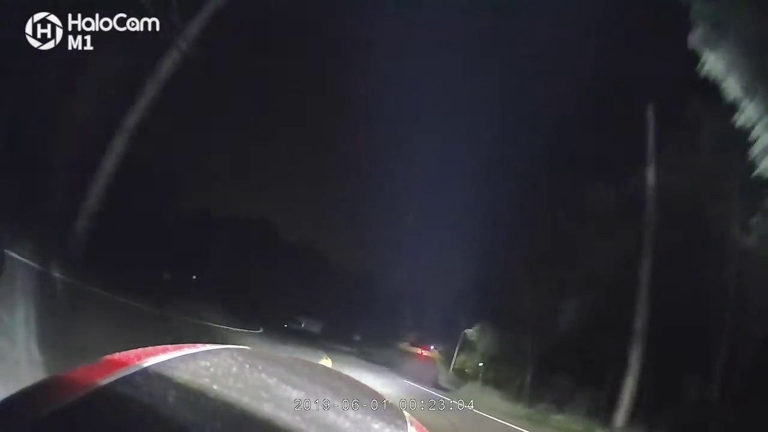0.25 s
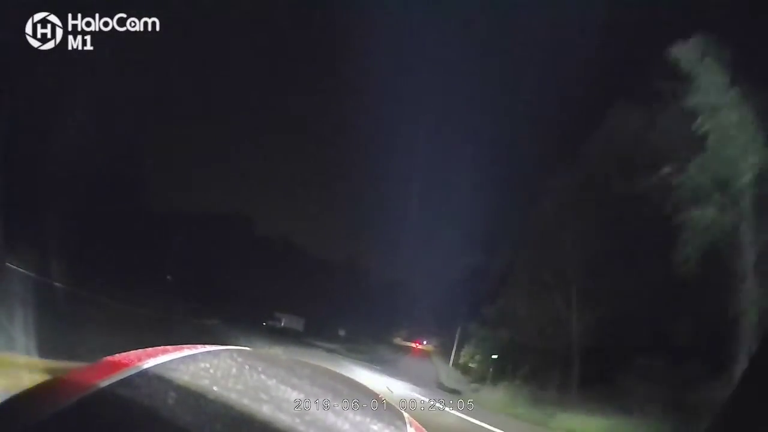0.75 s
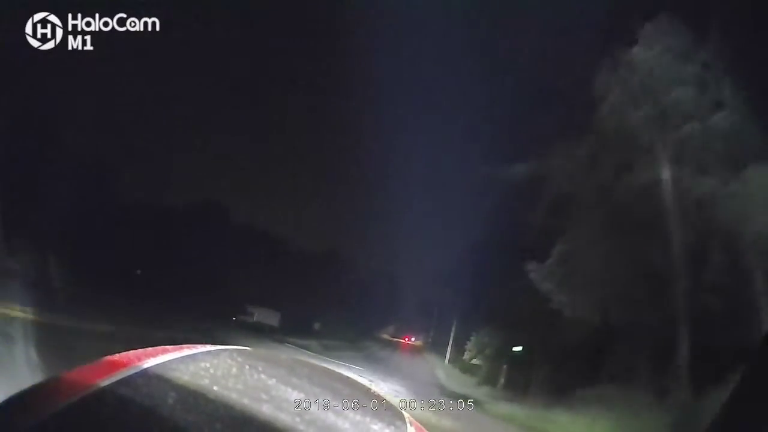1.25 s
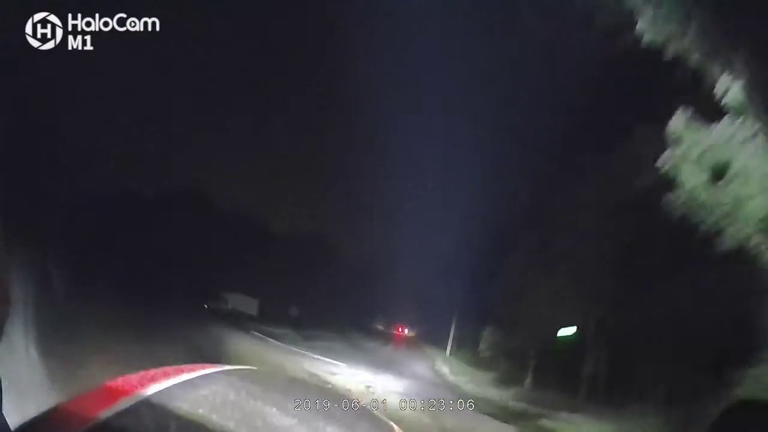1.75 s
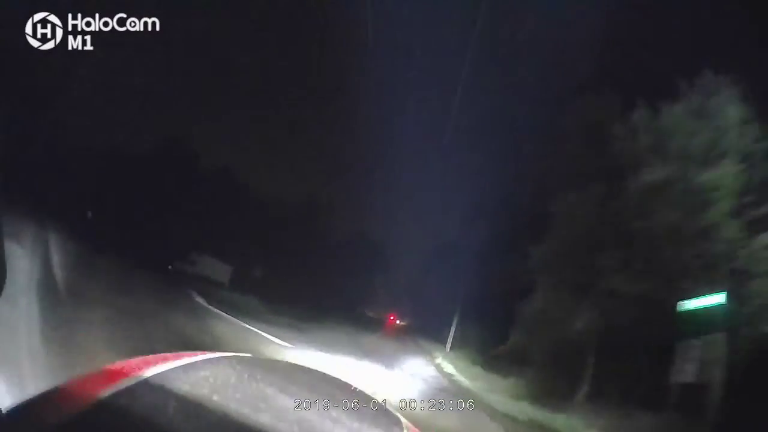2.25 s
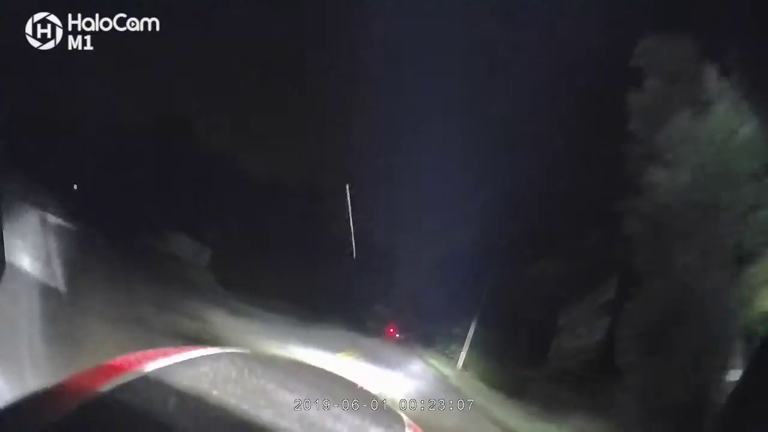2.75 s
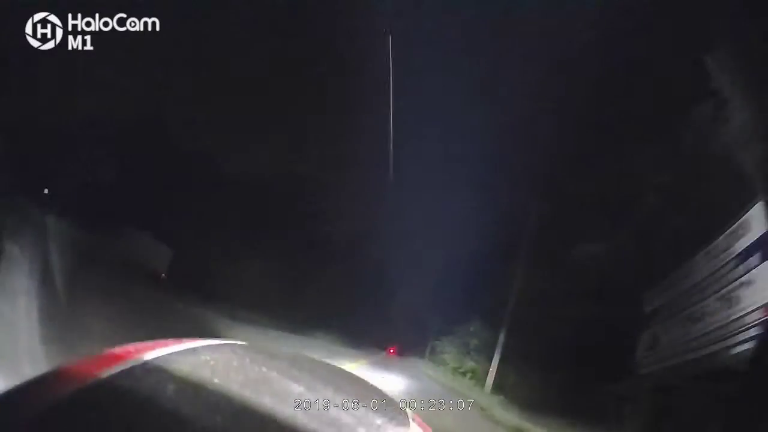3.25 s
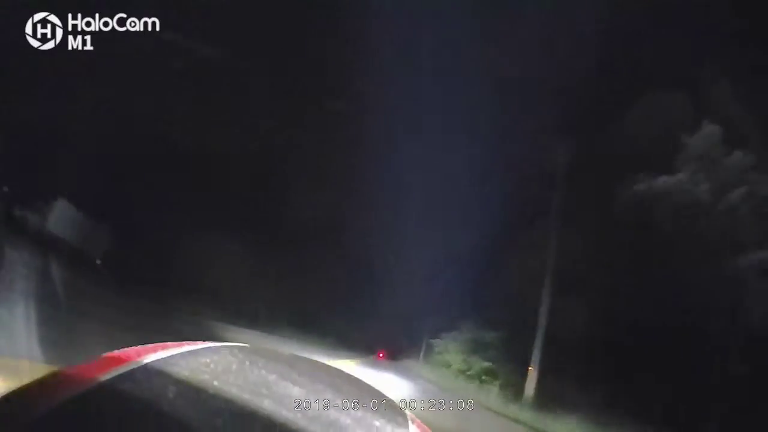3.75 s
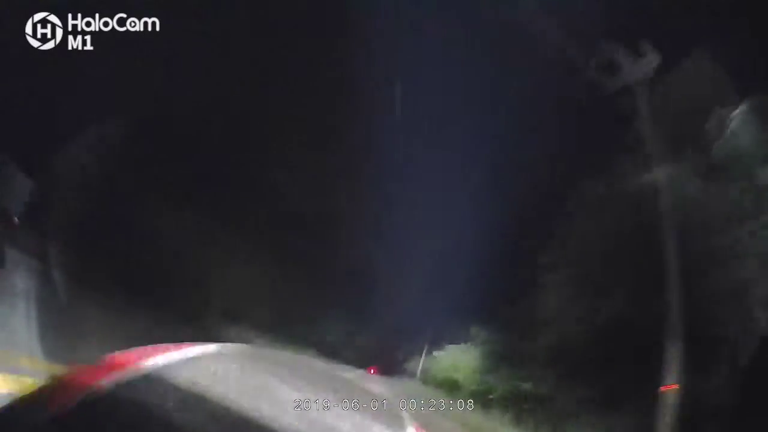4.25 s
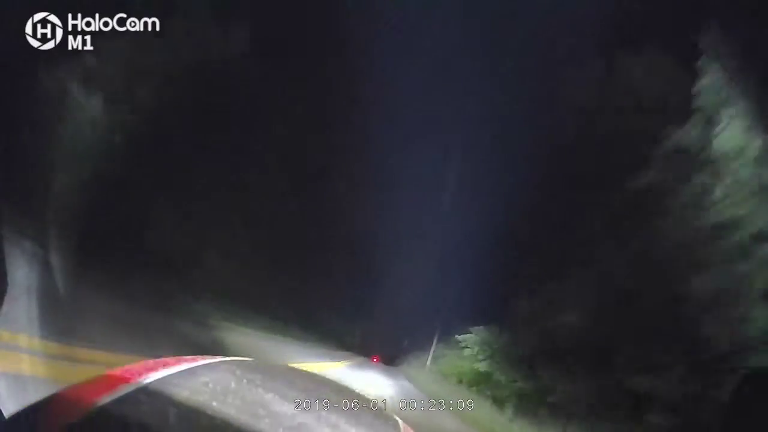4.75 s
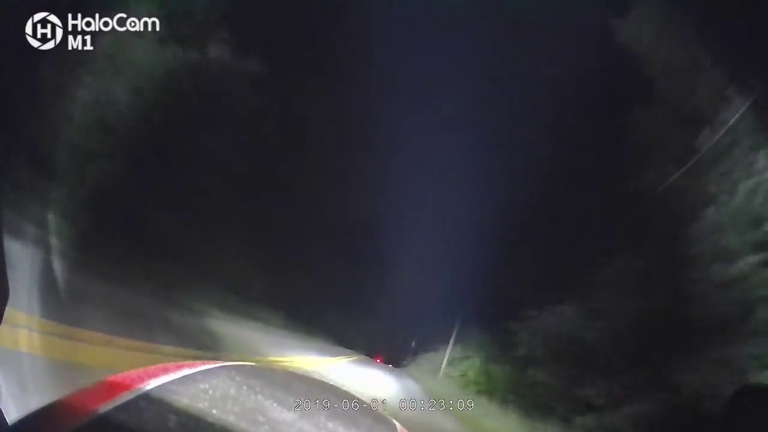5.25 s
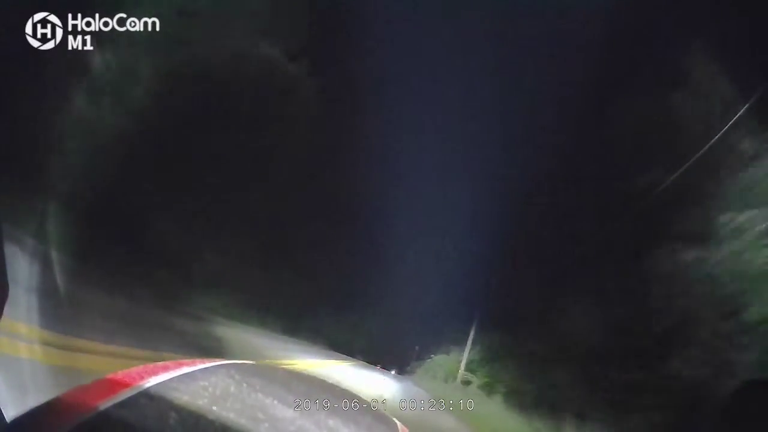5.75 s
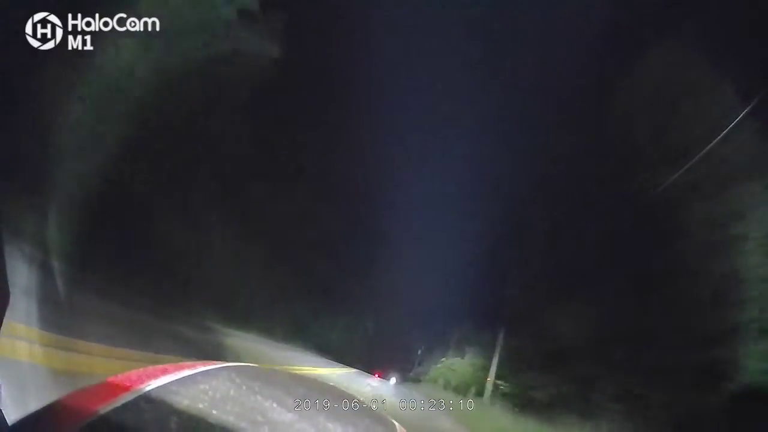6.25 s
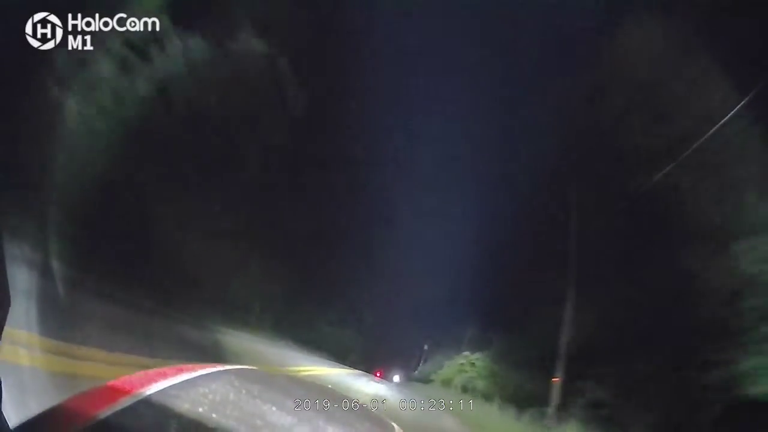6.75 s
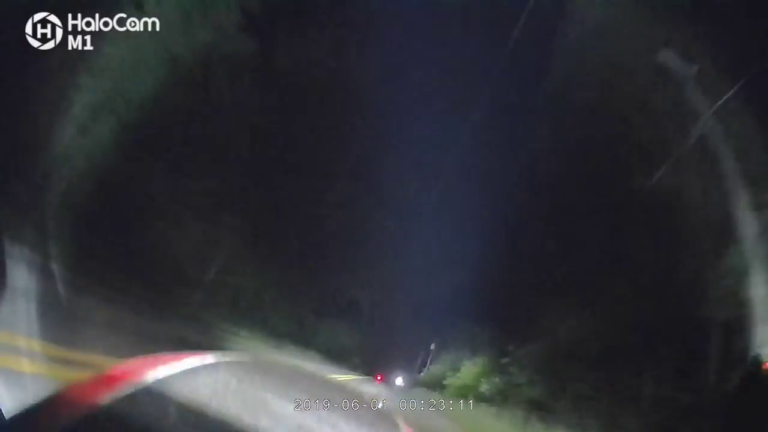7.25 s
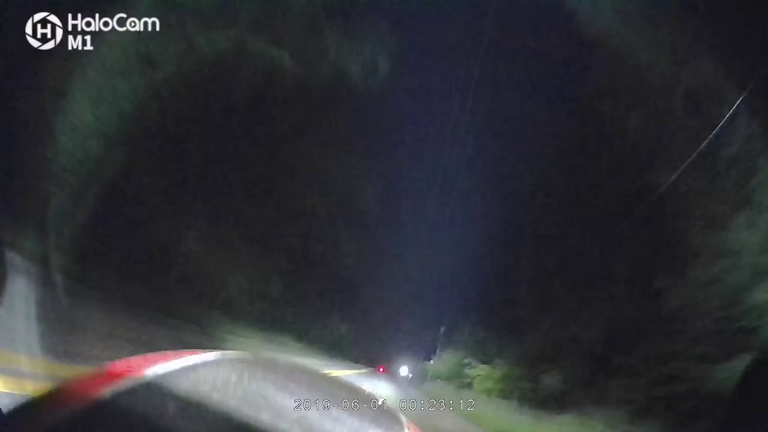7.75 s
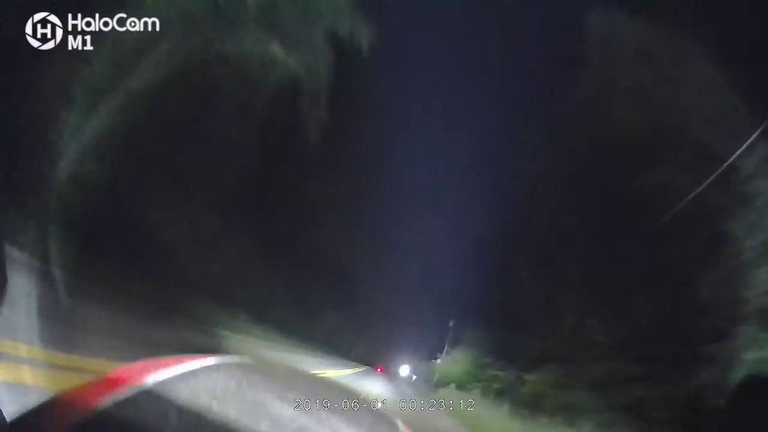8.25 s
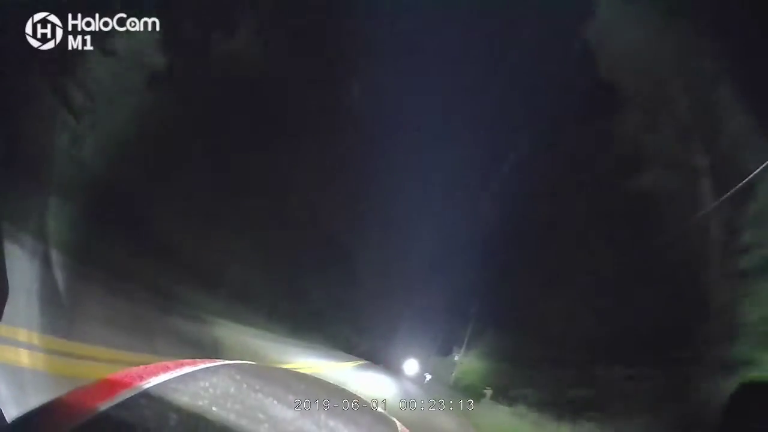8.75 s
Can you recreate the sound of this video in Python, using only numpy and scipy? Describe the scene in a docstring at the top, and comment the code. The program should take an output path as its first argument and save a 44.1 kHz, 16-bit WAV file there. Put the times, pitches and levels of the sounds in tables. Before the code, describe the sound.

A motorcycle runs continuously on an open road, heard in mono by a small device fixed to it. From 0 to about 2.5 s the throttle is shut: a low, throbbing exhaust drone sinks slightly in pitch, with a stronger boom and rasp around 0.7 to 1.3 s, then a thinner, quieter stretch. Wind buffets underneath, soft thumps strike the microphone, mostly around 1.7 to 2.3 s, and bumps shake out short, faint rattles. Around 3.3 to 3.5 s the throttle opens and the growl fills out, pitch creeping upward. More small knocks come between 3.7 and 5.5 s. From about 6 s it opens fully, climbing steadily into a stronger, higher drone with gear whine, metallic clatter and rushing air, still rising at 9 s. Treble is cut off; peaks sound flattened with slight crackle.

```python
"""A throbbing exhaust boom comes first, the throttle shut and the revs sinking; a motorcycle then pulls up through them.
Four uneven firings per four-stroke cycle set the phases of the boom and growl and time the bursts of a pulsed rasp.
Casing and valve gear ring as resonators, bumps shake out short rattles, and wind buffets, thumps and rushes.
A small device on the bike hears it: loud peaks flatten, the treble is cut, and what still peaks clips with a faint crackle."""
import sys
import numpy as np
from scipy import signal
from scipy.fft import rfft, irfft, next_fast_len
from scipy.io import wavfile

SR = 44100
rng = np.random.default_rng(int(sys.argv[2]) if len(sys.argv) > 2 else 0)


def generate_wav(sig):
    """Save sig (samples, or channels by samples) to the path in sys.argv[1] as 16-bit PCM at SR."""
    pcm = np.round(np.clip(np.atleast_2d(sig).T, -1, 1) * 32767).astype(np.int16)
    wavfile.write(sys.argv[1], SR, pcm)


N = 396459
TIME = np.arange(N) / SR  # s

# engine speed: (time [s], four-stroke cycle rate [1/s])
CYCLE_RATE = [(0, 25.67), (1.55, 23.49), (2.45, 23.22), (3.75, 24.44), (4.75, 25.28), (5.15, 25.25),
              (5.6, 25.7), (6.0, 25.83), (8.0, 28.82), (8.6, 29.9), (8.99, 30.38)]
# twist grip: (time [s], throttle opening [0-1])
THROTTLE_OPENING = [(0, 0), (3.25, 0), (3.5, .5), (5.95, .5), (6.15, 1), (8.99, 1)]
# combustion load, on a decibel scale that the rasp, casing and exhaust follow: (time [s], load [dB])
COMBUSTION_LOAD = [(0.0, -30), (0.72, -26), (1.33, -34.5), (1.45, -37), (2.65, -34.5), (2.88, -31.5),
                   (3.33, -35), (3.5, -28), (3.53, -30.5), (4.68, -27), (6.26, -29), (8.39, -26.5),
                   (8.96, -28), (8.99, -28)]
# firings within a cycle: (share of the cycle [0-1], relative strength [dB])
FIRING_PATTERN = [(0.039, 0), (.27, 0.5), (.52, 2), (0.778, 0.5)]

# low exhaust lines: (multiple of the cycle rate, relative level shut [dB], half open [dB], fully open [dB])
BOOM_LINES = [(4, -24.5, -20, -20), (5, -31.5, -16, -12)]
# third multiple, which strengthens with the revs: (cycle rate [1/s], relative level [dB])
THIRD_LINE = [(25.6, -36), (26.4, -23), (28.2, -17.5)]
# a boom line moves to a held level: (start [s], release begins [s], multiple, relative level held [dB])
BOOM_SWELLS = [(0.715, 1.27, 5, -11.5), (0.724, 1.3, 4, -16.5), (1.333, 1.51, 5, -20),
               (2.717, 3.44, 5, -22), (3.446, 4.13, 5, -10), (4.475, 5.72, 4, -15), (6.038, 6.55, 4, -18.5),
               (6.069, 7.2, 5, -10.5), (7.142, 7.68, 4, -13), (8.07, 8.31, 4, -10.5), (8.498, 9.0, 5, -13),
               (8.524, 9.0, 4, -7.5)]
# weaker exhaust lines and, in the last two rows, gear whines; each sounds at the nearest whole multiple:
# (multiple of the cycle rate, relative level shut [dB], half open [dB], fully open [dB])
GROWL_LINES = [(2, -22, -16.5, -22), (6, -11.5, -31, -12.5), (7, -19, -8.5, -17), (8, -20.5, -8.5, -10),
               (9, -14, -8, -7), (10, -24, -23, -16), (11, -29, -13, -10.5), (11.718, -14.5, -8, -8.5),
               (13.01, -13, -23, -15.5), (15.49, -11.5, -16.5, -11.5), (15.93, -21, -14.5, -11),
               (17.03, -10.5, -15, -8), (17.677, -33, -23, -19.5), (19.099, -14.5, -19, -31.5),
               (21.034, -30, -31, -18.5), (22.25, -20, -28, -25.5), (23.8, -21, -20, -31),
               (26.58, -27, -32.5, -22.5), (28.244, -31.5, -23.5, -18.5), (28.753, -20.5, -29.5, -26),
               (29.517, -26, -20, -28.5), (50, -30, -35, -23.5), (85.68, -21.5, -21.5, -34)]
# silencer response that the growl lines glide through: (frequency [Hz], gain [dB])
SILENCER_RESPONSE = [(50, 0), (350, -0.5), (420, 0.5), (474, 3), (492, -5), (620, -3), (720, -1), (790, 6),
                     (860, 5), (950, -4)]
# the rasp surges briefly: (start [s], release begins [s], added level [dB])
RASP_SURGES = [(0.801, 1.154, 2), (3.945, 4.215, 3), (4.927, 5.059, 3.5)]

# resonances of exhaust pipe, rasp, casing and valve gear: (frequency [Hz], bandwidth [Hz], relative level [dB])
PIPE_MODES = [(169.44, 50, 0.5), (310.62, 86.5, -2), (406.2, 48.79, 3), (609.96, 57, -19.5)]
RASP_MODES = [(593.92, 100, -2.5), (791.19, 80.48, 3), (915.26, 90.49, 3), (1076, 120, -5)]
CASING_MODES = [(1574.1, 220, -6), (1924.4, 160, -5), (2114.8, 173.42, -3), (2656.8, 130, -2),
                (2822.8, 140, -6), (3377, 290, -12.5)]
VALVE_MODES = [(1599.9, 130, -5.5), (1971.5, 180, 0.5), (2601.3, 400, -15)]

# loose fittings knocked by bumps in the road: (time [s], relative strength [dB])
ROAD_KNOCKS = [(.263, -19), (.492, -13.5), (0.626, -10.5), (0.88, -9.5), (1.093, -20.5), (1.863, -26.5),
               (2.775, -20), (2.839, -14.5), (2.882, -17), (3.706, -15), (3.908, -10.5), (4.352, -13.5),
               (4.962, -14.5), (5.226, -6.5), (5.436, -15)]
# gusts that thump the housing: (time [s], peak of the push [dB], time scale [s])
WIND_THUMPS = [(0.231, -0.5, 0.007165), (1.72, -5.5, 0.00467), (1.895, -10, 0.005844),
               (2.106, -5.5, 0.0077), (2.342, -7, 0.00935), (3.144, -3.5, 0.007084), (3.987, -6, 0.011788),
               (5.284, -18, 0.016), (5.445, -5.5, 0.020685), (8.346, -9.5, 0.00822)]
# wind spectra: (frequency [Hz], relative density [dB per Hz])
BUFFET_SPECTRUM = [(10, -18), (22, -5.5), (35, 0.5), (60, -8), (100, -7.5), (170, -14.5), (400, -38),
                   (1000, -68.5)]
RUSH_SPECTRUM = [(100, 0.5), (350, 6), (550, 8.5), (800, -1), (1150, 1), (1450, 5.5), (1800, -3),
                 (2350, -7.5), (2700, -5), (3100, -8.5), (3500, -9.5), (4200, -29)]
EDDY_SPECTRUM = [(30, -3.5), (220, -2.5), (600, -23.5), (2000, -67.0)]

# exhaust at the usual load, relative; rush of air and tyres: (shut [dB], half open [dB], fully open [dB])
EXHAUST_LEVELS = (-19.5, -19, -15.5)
RUSH_LEVELS = (-34, -28.5, -25)

CRANK_START = .5  # share of a cycle already turned at the start
USUAL_LOAD_DB = -28
# layer level at the usual load [dB], and its gain per dB of load [dB/dB]
RASP_LEVEL_DB, RASP_FOLLOWS = -22.971, 0.8915
CASING_LEVEL_DB, CASING_FOLLOWS = -28.5213, 1.4607
EXHAUST_FOLLOWS = 0.29
SWELL_ATTACK_S, SWELL_RELEASE_S = .07, .09
# the clean growl falters once
GROWL_DIP_START_S, GROWL_DIP_END_S, GROWL_DIP_DB = 7.57, 7.7, -5.5
# buffeting: level at the usual cycle rate [1/s], rise per cycle/s, and spread of the gusts
USUAL_CYCLE_RATE, BUFFET_LEVEL_DB, BUFFET_DB_PER_CYCLE, GUST_DB = 25, -21, 1.272, 2
BAND_EDGE_HZ, STOP_EDGE_HZ = 3780, 15900


def boom(cycles, speed, throttle, level_db, waver):
    """Beating: neighbouring multiples 3, 4 and 5 of the cycle rate interfere once a cycle, heard as a throb."""
    third_gain = from_db(np.interp(speed, *np.transpose(THIRD_LINE)))
    lines = third_gain * exhaust_line(cycles, 3, waver)
    for multiple, *levels_db in BOOM_LINES:
        gain = by_throttle(throttle, levels_db)
        for start, end, swelling_multiple, held_db in BOOM_SWELLS:
            if swelling_multiple == multiple:
                gain = gain + swell(start, end) * (from_db(held_db) - gain)
        lines = lines + gain * exhaust_line(cycles, multiple, waver)
    return from_db(level_db) * lines


def exhaust(cycles, speed, throttle):
    """Harmonic series and filtered turbulence: clean growl and gear-whine lines over a looser pipe burble."""
    silencer_hz, silencer_db = np.transpose(SILENCER_RESPONSE)
    lines = 0
    for multiple, *levels_db in GROWL_LINES:
        gain = by_throttle(throttle, levels_db)
        passed = np.interp(multiple * speed, silencer_hz, from_db(silencer_db))
        lines = lines + gain * passed * exhaust_line(cycles, round(multiple), waver=.15)
    lines = lines * from_db(GROWL_DIP_DB * swell(GROWL_DIP_START_S, GROWL_DIP_END_S))
    puffs = firing_puffs(cycles, decay_s=.004, uneven_db=3.5, steady=0.43, crack=0.13)
    burble = resonate(puffs, PIPE_MODES)
    # the burble recedes as the throttle opens
    return from_db(0.9131) * lines + from_db(-0.5 - 3.748 * throttle) * burble


def exhaust_line(cycles, multiple, waver):
    """Fourier phase: the firing pattern sets one harmonic's phase; strength and phase then waver slowly."""
    pattern = sum(from_db(db) * np.exp(-2j * np.pi * multiple * share) for share, db in FIRING_PATTERN)
    phase = 2 * np.pi * multiple * cycles + np.angle(pattern)
    strength = np.sqrt(2) * (1 + waver * drift(4.5))
    return strength * np.cos(phase + waver * drift(2.5))


def firing_puffs(cycles, decay_s, uneven_db, steady, crack):
    """Pulsed turbulence: each firing is a sharp crack and a dying puff of noise, over a steady flow."""
    clicks = np.zeros(N)
    for share, db in FIRING_PATTERN:
        firing_cycles = np.arange(int(cycles[-1]) + 1) + share
        at = np.searchsorted(cycles, firing_cycles)
        at = at[(at > 0) & (at < N)]
        clicks[at] += from_db(db + uneven_db * rng.standard_normal(len(at)))
    decay = np.exp(-1 / (decay_s * SR))
    puffs = rms_one(signal.lfilter([1], [1, -decay], clicks))
    return (puffs + steady) * rng.standard_normal(N) + crack * rms_one(clicks)


def rasp(cycles):
    """Forced resonance: gas pulses ring the intake and silencer."""
    puffs = firing_puffs(cycles, decay_s=0.0037, uneven_db=2.5, steady=0.59, crack=0.71)
    return resonate(puffs, RASP_MODES)


def clatter(cycles):
    """Structural resonance: combustion knock rings the engine casing."""
    knocks = firing_puffs(cycles, decay_s=0.0048, uneven_db=4.0, steady=1.0, crack=0.11)
    return resonate(knocks, CASING_MODES)


def valve_gear(cycles):
    """Impact excitation: tappets tick at a level independent of load."""
    ticks = firing_puffs(cycles, decay_s=0.0013, uneven_db=1.5, steady=0.61, crack=0.45)
    return from_db(-39.5) * resonate(ticks, VALVE_MODES)


def road_knocks():
    """Transient excitation: bumps shake short, decaying rattles out of the bike's metalwork."""
    shake = 0
    for s, db in ROAD_KNOCKS:
        shake = shake + from_db(db) * np.exp(-np.abs(TIME - s) / 0.0026) * (TIME >= s)
    rattle = resonate(shake * rng.standard_normal(N), RASP_MODES + CASING_MODES)
    return from_db(-3.0) * np.sqrt(np.mean(shake ** 2)) * rattle


def wind(speed, throttle):
    """Turbulent pressure: buffeting grows with engine speed, the rush of air and tyres with throttle; gusts thump."""
    buffet_db = BUFFET_LEVEL_DB + BUFFET_DB_PER_CYCLE * (speed - USUAL_CYCLE_RATE)
    out = from_db(buffet_db + GUST_DB * drift(8)) * coloured_noise(BUFFET_SPECTRUM)
    eddies = coloured_noise(EDDY_SPECTRUM)
    for s, db, length in WIND_THUMPS:
        u = (TIME - s) / length
        push = np.exp(-u * u) * np.cos(2 * u)
        # a longer swirl of eddies follows behind the push
        swirl = 0.34 * np.exp(-(u - 1) ** 2 / 2) * eddies
        out = out + from_db(db) * (push + swirl)
    return out + by_throttle(throttle, RUSH_LEVELS) * coloured_noise(RUSH_SPECTRUM)


def resonate(x, modes):
    """Modal superposition: parallel resonances with alternating signs, scaled to unit power."""
    out = 0
    for k, (hz, width, db) in enumerate(modes):
        r = np.exp(-np.pi * width / SR)  # pole radius
        top = (-1) ** k * from_db(db) * (1 - r * r) / 2
        out = out + signal.lfilter([top, 0, -top], [1, -2 * r * np.cos(2 * np.pi * hz / SR), r * r], x)
    return rms_one(out)


def coloured_noise(spectrum):
    """Spectral shaping: white noise weighted over log frequency, scaled to unit power."""
    hz, db = np.transpose(spectrum)
    size = next_fast_len(N)
    bins = np.maximum(np.fft.rfftfreq(size, 1 / SR), 1)
    gain = from_db(np.interp(np.log(bins), np.log(hz), db))
    return rms_one(irfft(rfft(rng.standard_normal(size)) * gain, size)[:N])


def drift(rate):
    """Low-passed chance: slow noise of unit spread, with two equal poles at the rate in Hz."""
    r = np.exp(-80 * np.pi * rate / SR)  # one step every 40 samples
    white = rng.standard_normal(N // 40 + 2002)
    slow = signal.lfilter([1], [1, -2 * r, r * r], white)[2000:]  # drop the filter's settling
    return np.interp(np.arange(N) / 40, np.arange(len(slow)), rms_one(slow))


def by_throttle(throttle, levels_db):
    """Linear interpolation of gain between shut, half-open and fully open throttle."""
    return np.interp(throttle, np.linspace(0, 1, len(levels_db)), from_db(levels_db))


def swell(start, end):
    """Envelope: linear attack from start, hold, and release from end, within 0 to 1."""
    attack = (TIME - start) / SWELL_ATTACK_S
    release = 1 - (TIME - end) / SWELL_RELEASE_S
    return np.clip(np.minimum(attack, release), 0, 1)


def in_time(rows):
    """Linear interpolation of each column of a curve at every sample."""
    s, *columns = np.transpose(rows)
    return [np.interp(TIME, s, column) for column in columns]


def from_db(db):
    """Logarithmic level: decibels to amplitude gain."""
    return 10 ** (np.asarray(db) / 20)


def rms_one(x):
    """Normalisation to unit mean-square power."""
    return x / np.sqrt(np.mean(x ** 2) + 1e-20)


def scene():
    """Superposition: crank rotation times every engine layer; throttle and load weight them; wind is added."""
    speed, = in_time(CYCLE_RATE)
    throttle, = in_time(THROTTLE_OPENING)
    load_db = in_time(COMBUSTION_LOAD)[0] - USUAL_LOAD_DB
    cycles = CRANK_START + np.cumsum(speed) / SR

    flow = by_throttle(throttle, EXHAUST_LEVELS) * from_db(EXHAUST_FOLLOWS * load_db)
    pipe = boom(cycles, speed, throttle, level_db=1.0, waver=0.09)
    pipe = pipe + flow * exhaust(cycles, speed, throttle)

    surge_db = sum(db * swell(start, end) for start, end, db in RASP_SURGES)
    engine = from_db(RASP_LEVEL_DB + RASP_FOLLOWS * load_db + surge_db) * rasp(cycles)
    engine = engine + from_db(CASING_LEVEL_DB + CASING_FOLLOWS * load_db) * clatter(cycles)
    engine = engine + valve_gear(cycles)
    return (pipe + engine + road_knocks() + wind(speed, throttle))[None]


def overload(x, top, hardness):
    """Saturation: peaks flatten toward the top level, with a knee of the given hardness."""
    return x / (1 + np.abs(x / top) ** hardness) ** (1 / hardness)


def record(dry):
    """Nonlinear distortion and band limiting: saturate, cut the treble, clip with a faint crackle, cut the top."""
    saturated = overload(dry, top=0.89782, hardness=5.656)
    band = signal.ellip(10, .3, 90, BAND_EDGE_HZ, fs=SR, output="sos")
    narrow = signal.sosfilt(band, saturated)
    clipped = np.clip(narrow, -.705, .705)
    ceiling = signal.cheby2(12, 70, STOP_EDGE_HZ, fs=SR, output="sos")
    return signal.sosfilt(ceiling, clipped)


dry = scene()
out = record(dry)
generate_wav(out)
```